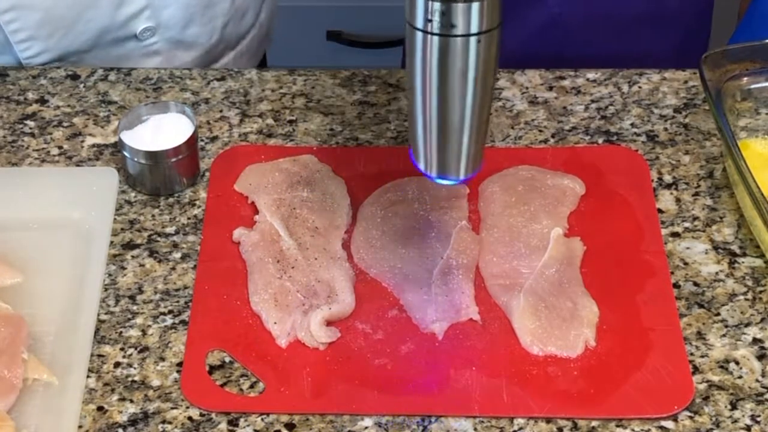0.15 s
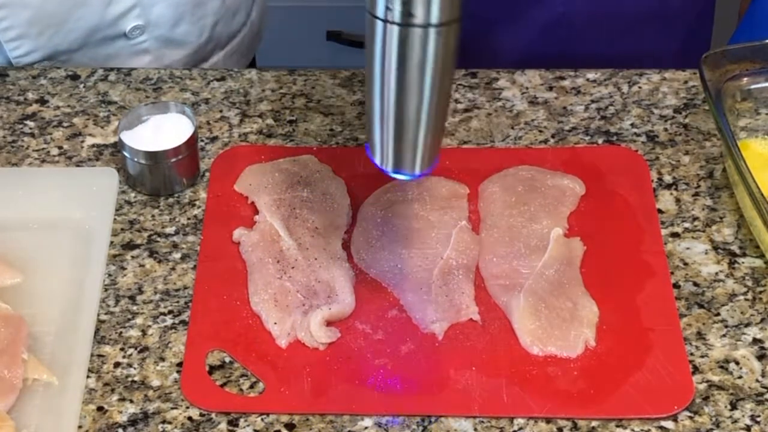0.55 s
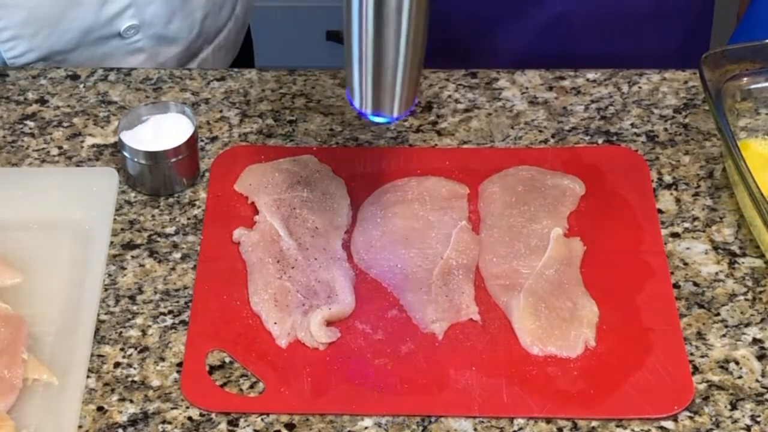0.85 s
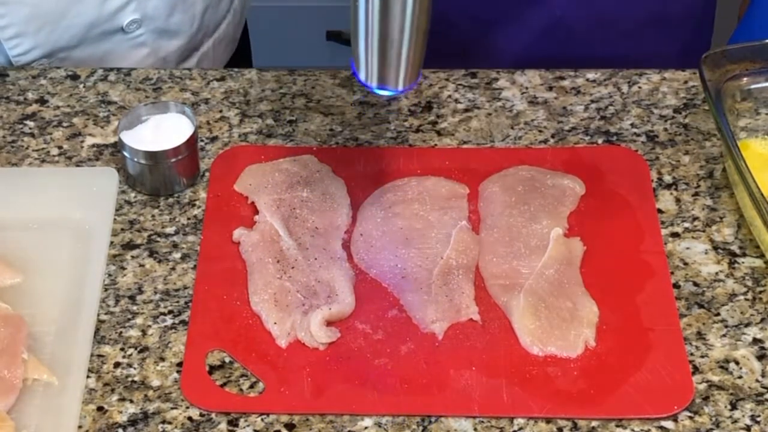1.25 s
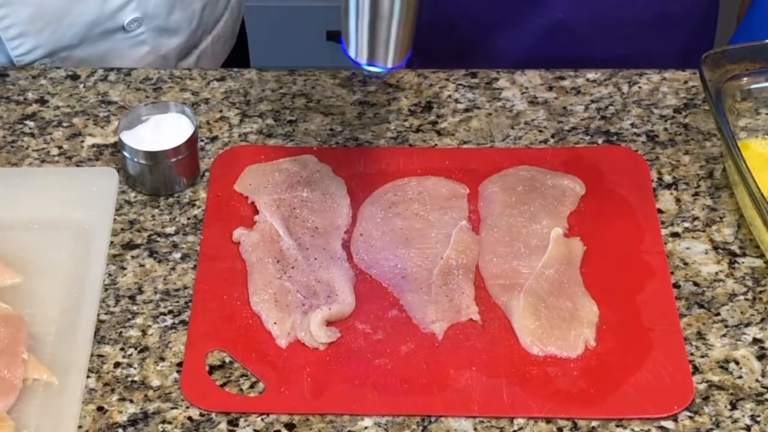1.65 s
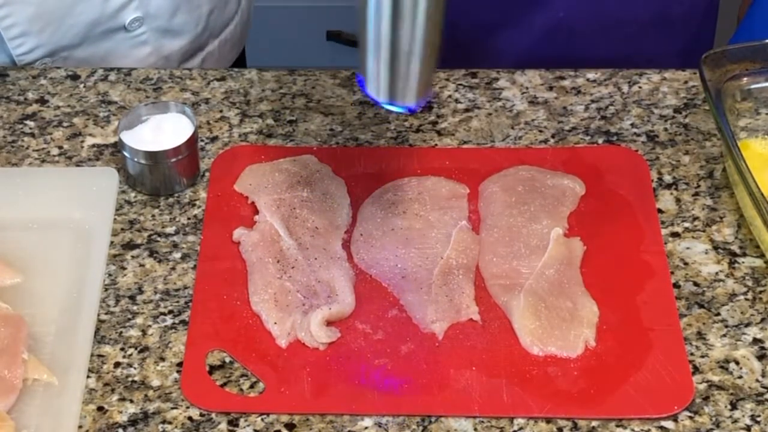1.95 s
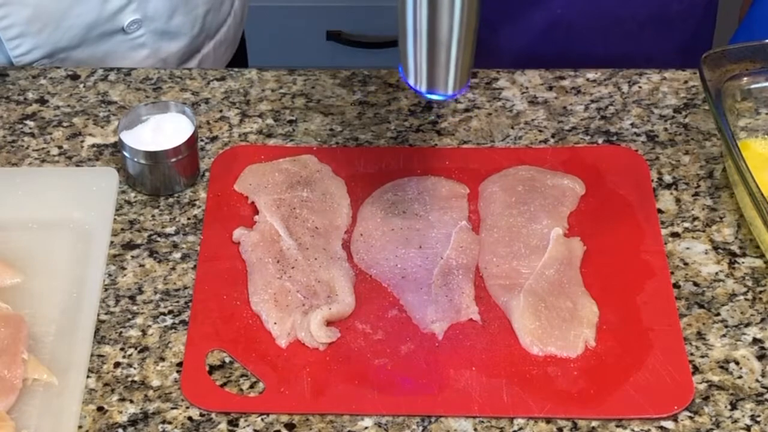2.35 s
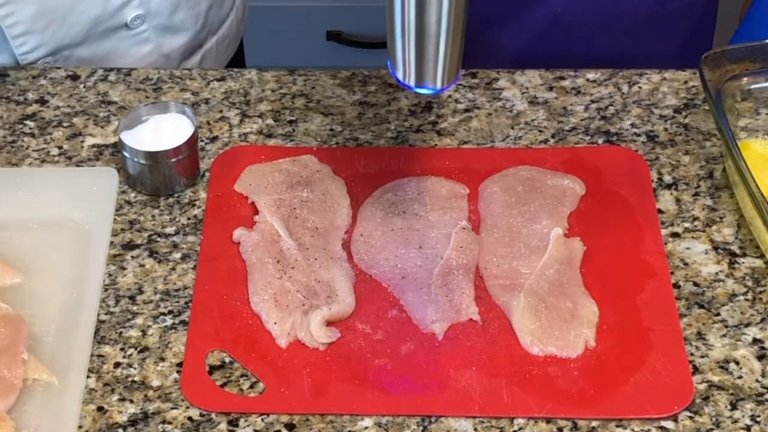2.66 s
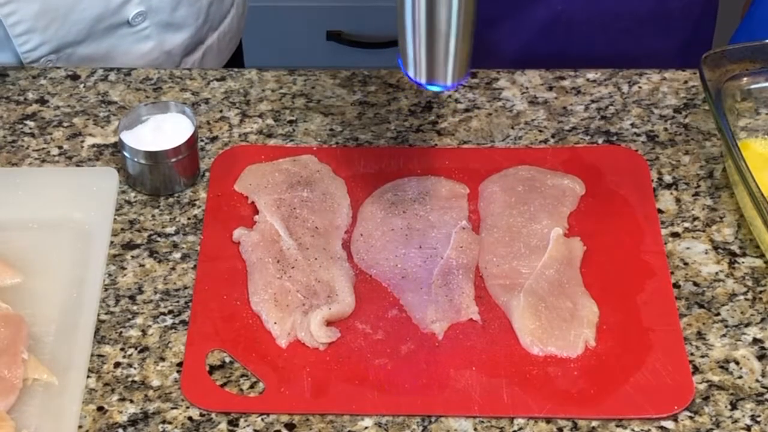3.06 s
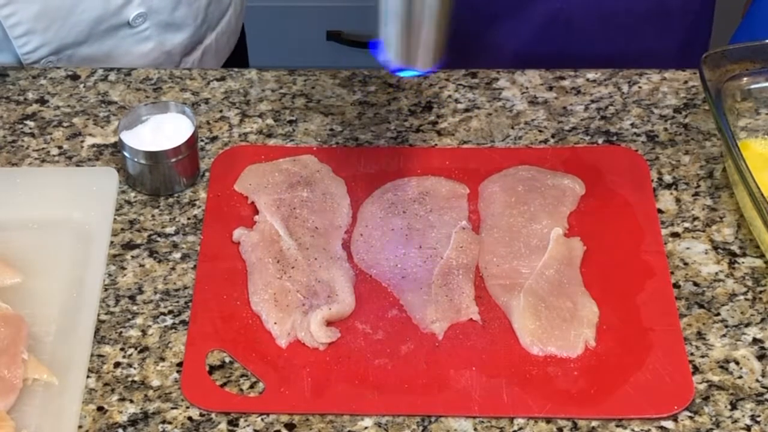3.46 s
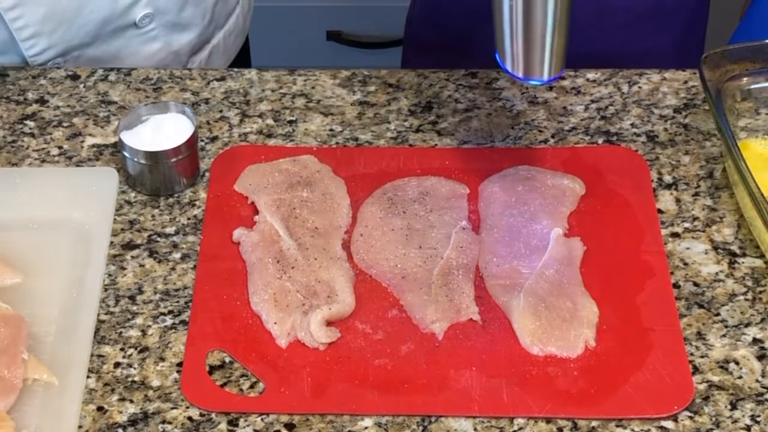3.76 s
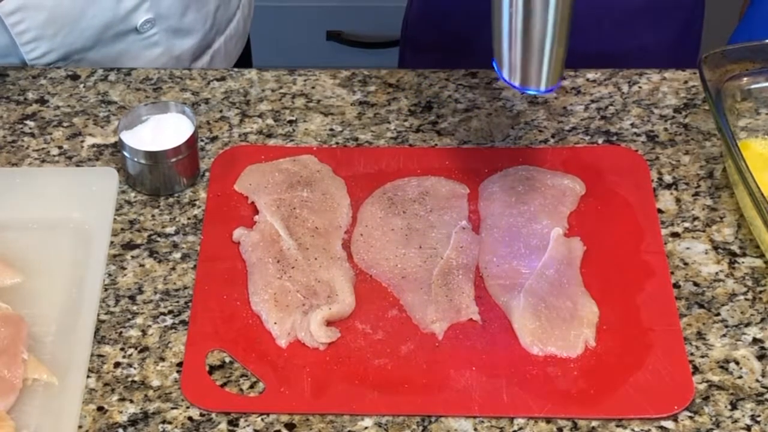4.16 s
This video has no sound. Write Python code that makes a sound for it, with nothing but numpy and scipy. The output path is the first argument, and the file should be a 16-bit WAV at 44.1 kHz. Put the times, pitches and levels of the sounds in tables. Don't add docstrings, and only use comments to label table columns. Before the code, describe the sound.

A battery-powered pepper mill grinds continuously from 0 to about 4.3 seconds, already running at the start and still running at the end. Its small geared motor gives a thin, reedy whine around 1.6 kHz with a higher companion tone, fluttering and sagging briefly as peppercorns load the burr. Over it lies a dense, bright, gritty hiss, nearly steady, colored by shifting rings of the steel tube. A hard corn snaps at 1.0 second. At about 1.7 the sound dips for a few hundredths of a second, then resumes. The loudest dry crack comes at 3.1, with another right behind it; other ticks are faint. From about 3.7 the motor labors, dipping in pitch with rougher high buzzing. Close phone microphone, same sound in both channels, with tight counter reflections, a light hard-walled kitchen tail and a faint fridge drone far beneath.

```python
import sys
import numpy as np
from scipy import signal
from scipy.fft import rfft, irfft, next_fast_len
from scipy.io import wavfile
from scipy.ndimage import uniform_filter1d

SR = 44100
rng = np.random.default_rng(int(sys.argv[2]) if len(sys.argv) > 2 else 0)


def generate_wav(signal):
    frames = np.transpose(np.atleast_2d(signal))
    scaled = np.clip(frames, -1, 1) * 32767
    pcm = np.round(scaled).astype(np.int16)
    wavfile.write(sys.argv[1], SR, pcm)


N = 190244

# (time [s], gear mesh [Hz], gearbox facing the phone [dB])
MOTOR = [(0.0, 1695, -1), (0.2, 1683, 8.5), (0.544, 1777, 3), (0.81, 1616, 0.5), (0.95, 1711, -1.5),
         (1.17, 1684, -1.5), (1.4, 1703, 4.5), (1.54, 1748, 2), (1.671, 1652, 2), (1.926, 1590, 0.5),
         (2.19, 1741, 1), (2.454, 1682, 5), (2.6, 1582, 2.5), (3.0, 1611, 1), (3.27, 1555, -1.5),
         (3.507, 1658, -1), (3.692, 1643, -6.5), (4.31, 1575, 0.5)]
# (time [s], mesh sag [Hz], half length [s], mesh
# gain [dB], commutator gain [dB])
TONE_SHIFTS = [(0.1, 3.5, 0.045, 3, 2), (0.221, 39.5, 0.046, 1.5, 3), (0.375, 1.5, 0.064, -14, -3),
               (.55, 1, 0.15, 0, -10), (1.807, 2, 0.059, -5, -0.5), (0.935, 0, 0.028, -10, 5),
               (1.055, 105.5, 0.046, -9, 3.5), (1.194, 0, 0.05, 12, 6), (1.361, 1.5, 0.048, 8.5, 2),
               (2.177, 3, 0.072, -5, 5), (2.252, 35, 0.047, 12.5, 0), (2.331, 50, 0.05, -5, 2),
               (2.399, -5, 0.036, 4, 2), (2.772, -5, 0.045, 2.5, 6), (2.853, 48, 0.064, -4.5, -9),
               (2.939, 3, 0.028, -24, 6.5), (3.041, 20, 0.043, -2.5, -3), (3.105, 172.5, .043, 8, -2),
               (3.058, 0.5, 0.011, -6, -6), (3.2, -0.5, 0.059, 2, -7.5), (3.19, 60.5, 0.056, -12, -4),
               (3.368, 45, 0.08, -5, -11), (3.439, 1, 0.03, -3, 10), (3.49, 2, 0.062, -3.5, 4.5),
               (3.582, 48, 0.039, 6.5, 5.5), (3.681, -15, 0.065, 0, 11), (3.859, 0, 0.041, 2.5, -4),
               (3.998, 16, .02, -1, 0), (4.246, 24, .03, 0, -1), (3.847, 110.5, 0.097, 4, -7),
               (4.013, 231.5, 0.16, 2.5, -14),
               (0.034, 1, 0.036, 4, 9), (0.132, 1, .02, -3, -9), (0.189, 28, 0.022, -6.5, -2),
        (0.233, -0.5, 0.018, -9, -2.5), (0.31, 0.5, 0.013, 4, -9), (0.601, -11.5, 0.015, 8, 1),
        (0.676, -10.5, 0.021, 11, 1), (0.727, -2, 0.018, -5, 8), (0.77, 1.5, 0.022, 4.5, 4),
        (0.825, 9.5, 0.017, -11, 11), (1.007, 3, 0.036, 11, 3), (1.25, -0.5, 0.017, -11.5, -7),
        (1.296, -17, 0.06, 4.5, 2), (1.17, 0, 0.033, 1, 1), (1.746, 16.5, 0.03, 2.5, 1),
        (1.784, 3, 0.022, -4.5, 6), (1.898, -16.5, 0.031, 1, 3.5), (1.932, 11, 0.025, 0, 4.5),
        (2.025, 12.5, 0.022, -2, 11), (2.074, -9, 0.017, -1, 4.5), (2.277, 0, 0.024, -0.5, 6.5),
        (2.427, 0.5, 0.016, -1, -6), (2.466, 1, .02, 11.5, -0.5), (2.633, -11.5, 0.036, -6, 5.5),
        (2.716, -10.5, 0.022, -3, 6), (2.8, 2, 0.026, 1.5, -2), (2.908, 15.5, 0.027, -8, -3),
        (3.031, -10.5, 0.019, 4, 4.5), (3.059, -20.5, 0.017, -4, -1), (3.126, 2.5, 0.019, -9, 9),
        (3.288, 10, 0.038, -7.5, 1), (3.599, 14.5, 0.03, -4, 4.5), (3.727, 23.5, 0.027, 8, -6),
        (3.817, -5.5, 0.031, 3, -1), (3.917, -14.5, 0.042, 4.5, 9), (4.077, -21, 0.032, 3, -2),
        (4.166, 16.5, 0.045, 0, -2), (4.21, 13.5, 0.018, 3, 2.5), (4.267, 2.5, 0.022, -8, 2)]
# (pitch [Hz], level [dB])
MESH_HOUSING = [(1340, -38), (1425, -42), (1500, -41.5), (1600, -40.5), (1690, -50.5), (1725, -52.5),
                (1780, -55)]
COMMUTATOR_HOUSING = [(1800, -69), (1930, -54), (2080, -41.5), (2140, -47), (2260, -49.5), (2320, -50),
                      (2400, -53)]
BRUSH_HOUSING = [(600, -58.5), (635, -59.5), (665, -61.5), (720, -57.5), (760, -62.5), (800, -58)]
# (time [s], half length [s], gain [dB])
BRUSH_PRESS = [
    (.5, .08, 3),
    (2.34, .04, 4),
    (2.7, .06, 4),
    (2.89, .04, -5),
    (3.12, .06, -7),
    (3.4, .04, -5),
    (3.52, .06, 5),
    (3.95, .05, 8),
    (4.28, .05, -10),
]
# (time [s], half length [s], gain [dB])
COMMUTATOR_SING = [
    (1.92, .14, 2),
    (2.62, .17, 2),
    (3.58, .16, 2.5),
]
# (multiple of mesh rate [1], level [dB], extra at full load [dB])
SHAFT_ORDERS = [
    (.154, -73.5, 4.5),
    (.306, -75, -30),
    (.617, -64, -4),
    (.9, -58, 1),
    (1.068, -59, 6),
]
# (multiple of mesh rate [1], level [dB], extra while singing [dB], centre
# [s], half span [s])
ORDER_BUZZ = [(1.525, -65, 22, 3.98, .06), (2.07, -63, 15, 3.92, .2), (3.035, -64, 24.5, 3.8, .1),
              (3.02, -70, 24, 3.99, .07), (3.12, -70, 28, 4.11, .05), (3.3, -70, 27, 4.03, .09),
              (3.13, -70, 25, 4.26, .03), (.96, -75, 31, 2.87, .028), (.97, -75, 29, 3.37, .045),
              (.617, -80, 26, .64, .06), (.617, -80, 23, 3.27, .05), (.9, -75, 23, .85, .06),
              (.9, -75, 22, 1.81, .06), (1.22, -75, 29, 3.52, .03)]
# (time [s], crush level [dB])
BURR = [(0.0, -32), (0.2, -33), (0.55, -32), (0.75, -32), (0.875, -32), (1.0, -30.5), (1.125, -33),
        (1.35, -31.5), (1.6, -31.5), (2.0, -32), (2.4, -32), (2.85, -32), (3.0, -31.5), (3.25, -33.5),
        (3.62, -32.5), (3.875, -30.5), (4.125, -33.5), (4.31, -32)]
# (frequency [Hz], density [dB per Hz])
CRUSH = [(210, -34), (350, -17.5), (651, -23), (728, -14), (1140, -9.5), (1610, -0.5), (2150, 4),
         (2400, -6.5), (2770, -8.5), (3200, -3.5), (3630, -2), (4470, -2), (5950, -0.5), (8710, -3),
         (15700, -15)]
# (pitch [Hz], width [Hz], level [dB], centre [s], half span [s])
TUBE = [(3400, 73, -17, 0.16, .3), (4370, 260, -19, 0.17, 0.25), (5700, 430, -13.5, 0.17, 0.66),
        (12920, 120, -32, 0.54, .15), (9400, 150, -14, 0.79, 0.064), (5010, 280, -13, 1.37, 0.32),
        (12800, 150, -26, 1.51, .12), (6577, 152, -16, 1.87, 0.32), (8470, 100, -14.5, 2.4, 0.5),
        (4705, 530, -9, 2.71, 0.12), (5640, 156, -13, 3.01, 0.16), (6910, 610, -4, 3.2, 0.078),
        (9290, 194, -12, 3.85, 0.073), (6640, 310, -15, 3.73, 0.099), (4600, 350, -16, 3.92, 0.18),
        (4640, 305, -28, 3.02, 0.085), (7805, 280, -10, 3.9, 0.12)]
# (pitch [Hz], width [Hz], level [dB], centre [s], half span [s])
MAIN_RINGS = [
    (4440, 1100, -7.5, 0.29, 0.43),
    (4360, 530, -8.5, 2.14, 1.12),
    (4300, 860, -10, 4.136, 0.16),
    (7930, 130, -11, 0.26, 0.37),
    (7900, 200, -15, 0.75, 0.21),
    (7716, 226, -12, 1.16, 0.13),
    (7860, 246, -19, 1.84, 0.095),
    (7870, 190, -21, 1.4, 0.083),
    (7870, 290, -15, 3.18, 0.38),
]
# (lag [ms], share [-1..1], hand travel factor [1])
ECHO = [
    (0.551, -0.29, 1.04),
    (.95, -0.067, 0.66),
    (1.37, -0.1, -1.1),
]
# (time [s], extra lag [ms], echo gain [dB])
HAND = [(0, 0.042, -10), (.7, 0.022, -1), (1.2, 0.018, -8), (1.6, -0.058, -6), (2.1, -0.049, -3.5),
        (2.8, -0.098, -4), (3.4, 0.013, -2), (4.31, -0.0056, 0.5)]
# (frequency [Hz], density [dB per Hz])
KITCHEN = [(15, -50), (25, -40), (47, -4.5), (92, 2.5), (139, 4), (199, -3), (246, -3), (285, -4),
           (425, -15), (479, -4), (600, -2.5), (780, -10.5), (1320, -120)]
# (time [s], peak [dB], ring [Hz], fall by 60 dB [s])
SNAP = [
    (1.0217, -8, 7030, .0065),
    (3.0991, -3.5, 6600, .008),
    (3.111, -10.5, 6500, .011),
]
# (time [s], peak [dB], ring [Hz], fall by 60 dB [s])
TICK = [(.0821, -22, 4340, .008), (.4655, -22, 7900, .008), (1.0075, -22, 8500, .01),
        (1.0332, -21, 6800, .008), (2.0263, -25, 4600, .008), (2.4354, -24, 4390, .008),
        (2.4656, -24, 7700, .008), (2.5995, -22, 5650, .008), (2.6908, -22, 4700, .008),
        (3.745, -23, 4720, .008), (3.796, -21, 4560, .008), (4.2137, -24, 8120, .008)]
SHELL_PARTIALS = [(.4, .15), (.62, .35), (.95, 1.1), (1.04, 1), (1.17, .75), (1.4, .45), (1.55, .35),
                  (1.72, .22), (1.95, .15), (2.12, .12), (2.3, .12)]


def undb(db):
    return 10 ** (np.asarray(db) / 20)


def unit(x):
    return x / np.sqrt(np.mean(x ** 2))


def noise():
    return rng.standard_normal(N)


def curves(table):
    s, *columns = np.transpose(table)
    return [np.interp(np.arange(N) / SR, s, c) for c in columns]


def bell(s, half_s, power=2):
    return np.exp(-np.abs((np.arange(N) / SR - s) / half_s) ** power)


def walk(rate):
    k = int(SR / rate)
    held = np.repeat(rng.standard_normal(N // k + 1), k)
    return unit(uniform_filter1d(uniform_filter1d(held, k), k)[:N])


def colour(x, points, lo_hz=0, hi_hz=SR):
    size = next_fast_len(N)
    hz = np.arange(size // 2 + 1) * SR / size + 1e-3
    at, db = np.transpose(points)
    gain = undb(np.interp(np.log(hz), np.log(at), db, left=-90, right=-90))
    return irfft(rfft(x, size) * gain * (hz >= lo_hz) * (hz < hi_hz), size)[:N]


def ring(x, hz, width):
    return signal.lfilter(*signal.iirpeak(hz, hz / width, SR), x)


def patchy(x, db, bins, frames):
    z = signal.stft(x, nperseg=1024)[2]
    chance = uniform_filter1d(rng.standard_normal(z.shape), bins, axis=0)
    chance = uniform_filter1d(uniform_filter1d(chance, frames, axis=1), frames, axis=1)
    return signal.istft(z * undb(db * unit(chance)))[1][:N]


def whine():
    commutator, brush = 1.348, .45
    free_hz, stall_hz = 1570, 1400
    knocks = TONE_SHIFTS
    hz, facing_db = curves(MOTOR)
    hz = hz - sum(sag_hz * bell(s, half) for s, sag_hz, half, *_ in knocks)
    mesh_knock_db, comm_knock_db = sum(np.outer(db, bell(s, half)) for s, _, half, *db in knocks)

    mesh_db = np.interp(hz, *np.transpose(MESH_HOUSING)) + facing_db + mesh_knock_db + .6 * walk(14)
    comm_db = np.interp(commutator * hz, *np.transpose(COMMUTATOR_HOUSING))
    comm_db = comm_db + facing_db + comm_knock_db + .6 * walk(23.0)
    comm_db = comm_db + sum(db * bell(s, half, 3.1) for s, half, db in COMMUTATOR_SING)
    brush_db = np.interp(brush * hz, *np.transpose(BRUSH_HOUSING)) + 0.12 * comm_knock_db + 2 * walk(28.42)
    brush_db = brush_db + sum(db * bell(s, half) for s, half, db in BRUSH_PRESS)

    turn = 2 * np.pi * np.cumsum(hz * (1 + 0.0042 * walk(70))) / SR
    load = np.clip((free_hz - hz) / (free_hz - stall_hz), 0, 1)
    tones = [(1, mesh_db), (commutator, comm_db), (brush, brush_db)]
    tones += [(k, db + loaded_db * load + 3 * walk(5.26)) for k, db, loaded_db in SHAFT_ORDERS]
    clean = sum(undb(db + 1.1 * walk(55)) * np.sin(k * turn) for k, db in tones)
    buzz = np.zeros(N)
    for k, db, swell_db, s, half in ORDER_BUZZ:
        level = undb(db + swell_db * bell(s, half, 4))
        buzz += level * (.8 + .6 * walk(120)) * np.sin(k * turn)
    return np.sqrt(2) * (clean + buzz)


def grind():
    cracks_per_s, chips_per_s, chip_fade_s = 3000, 200, .002
    split_hz = 2450
    crush_db, = curves(BURR)
    t = np.arange(N) / SR
    bite = undb(.5 * walk(35.1) + 0.35 * walk(90))
    size_db = 2.5 * np.minimum(rng.exponential(size=N), 3)
    cracks = (rng.random(N) < cracks_per_s / SR) * undb(size_db) * noise()
    grit = bite * (noise() + 0.44 * unit(cracks))
    chips = (rng.random(N) < chips_per_s / SR) * np.minimum(rng.exponential(size=N), 3)
    chip_swell = signal.lfilter([1], [1, -np.exp(-1 / (chip_fade_s * SR))], chips)
    grit = grit * (1 + .27 * chip_swell)

    hiss = colour(grit, CRUSH, split_hz) / np.std(colour(grit, CRUSH, 3000, 14000))
    hiss = patchy(hiss, 1.5, bins=2, frames=6)
    hiss = patchy(hiss, 0.5, bins=30, frames=2)
    tube = sum(undb(db) * bell(s, span) * unit(ring(grit, hz, width))
               for hz, width, db, s, span in TUBE + MAIN_RINGS)
    rattle = unit(colour(noise() + .4 * grit, CRUSH, 0, split_hz))
    rattle = patchy(rattle, 1.0, bins=2, frames=4)
    rattle_db = -40 + .5 * t + .5 * walk(3.93)
    return undb(crush_db - 2.0) * (hiss + tube) + undb(rattle_db) * rattle


def surfaces(x):
    sway_ms = 0.012
    hand_ms, gain_db = curves(HAND)
    at = np.arange(N)
    echoes = np.zeros(N)
    for lag_ms, share, travel in ECHO:
        late_ms = lag_ms + travel * hand_ms + sway_ms * walk(4.027)
        echoes += share * np.interp(at - late_ms * SR / 1000, at, x)
    return x + undb(gain_db) * echoes


def kitchen():
    drone = undb(-64 + 1.9 * walk(6)) * unit(ring(noise(), hz=96.4, width=24))
    rumble = undb(-56.5 + 1.0 * walk(2.87)) * unit(colour(noise(), KITCHEN))
    return drone + rumble


def snaps():
    out, t = np.zeros(N), np.arange(600) / SR
    rise_s = .0013
    for s, db, hz, t60 in SNAP + TICK:
        hit = rng.standard_normal(len(t))
        fade = np.exp(-np.log(1000) * np.maximum(t - rise_s, 0) / t60)
        shape = np.clip(t / rise_s, 0, 1) ** 2 * fade
        ringing = sum(g * np.sin(2 * np.pi * k * hz * (t - rise_s)) for k, g in SHELL_PARTIALS)
        crackle = unit(ring(ring(hit, 8000, 7000), 8000, 7000))
        burst = shape * (ringing + .3 * crackle)
        shell = np.append(burst[28:], np.zeros(28)) * (t > .0003)
        splinter = np.roll(shape, 40) ** .7 * unit(ring(ring(hit, 3600, 4500), 3600, 4500))
        burst = burst + .3 * shell + .5 * splinter
        i = int(s * SR)
        out[i:i + len(t)] += undb(db) * burst / np.max(np.abs(burst))
    return out + .16 * np.roll(out, int(.0019 * SR))


def room(x):
    t60_s, level_db, first_s = .3, -13, .004
    t = np.arange(SR // 2) / SR
    tail = rng.standard_normal(len(t)) * np.exp(-np.log(1000) * t / t60_s) * (t > first_s)
    return x + undb(level_db) * signal.fftconvolve(x, tail / np.linalg.norm(tail))[:N]


def scene():
    mill = whine() + surfaces(grind()) + snaps()
    return np.tile(room(mill) + kitchen(), (2, 1))


def brief_dip(x):
    dip_s, half_s, floor_db = 1.6872, .0105, -17
    away = np.abs(np.arange(N) / SR - dip_s) / half_s
    return x * np.clip(away, undb(floor_db), 1)


def band_limit(x):
    return signal.sosfilt(signal.butter(12, 16410, fs=SR, output="sos"), x)


def record(dry):
    top_hz = 15830
    steep = signal.ellip(12, .3, 80, top_hz, fs=SR, output="sos")
    mix = signal.sosfilt(steep, brief_dip(dry))
    return band_limit(mix)


dry = scene()
out = record(dry)
generate_wav(out)
```